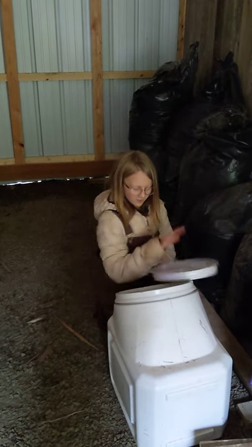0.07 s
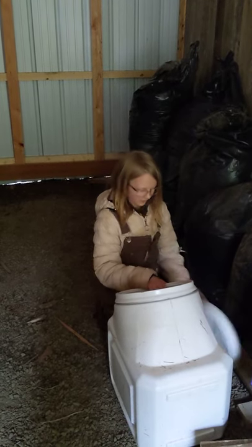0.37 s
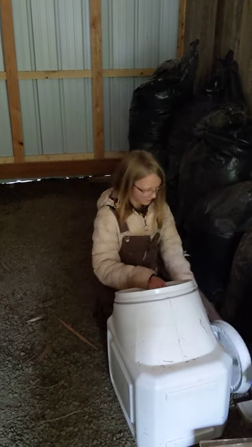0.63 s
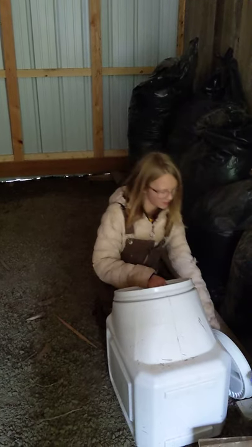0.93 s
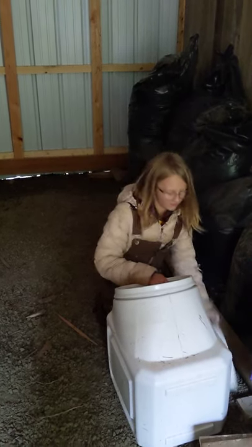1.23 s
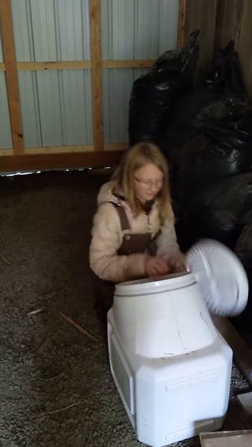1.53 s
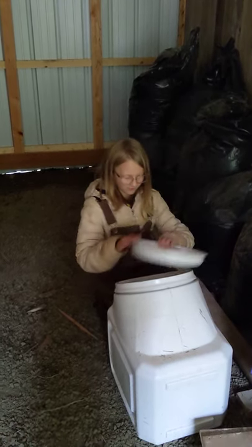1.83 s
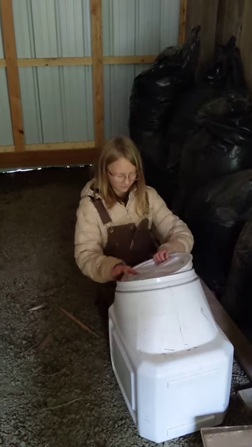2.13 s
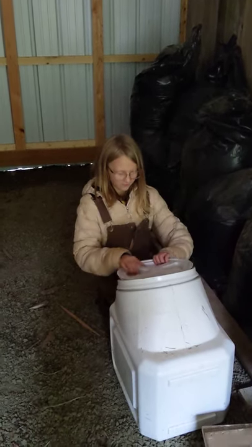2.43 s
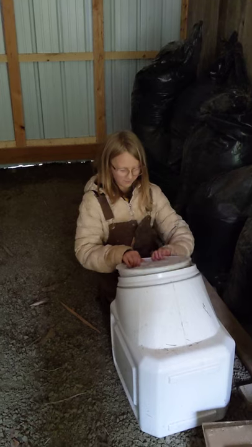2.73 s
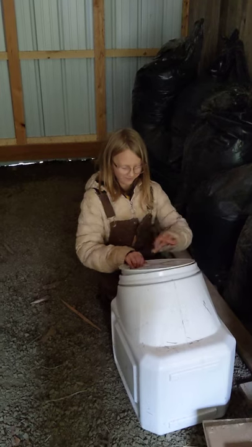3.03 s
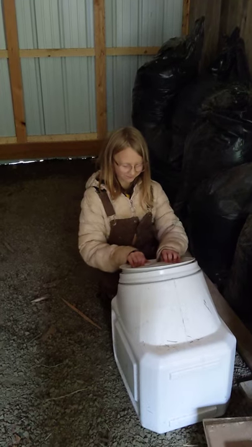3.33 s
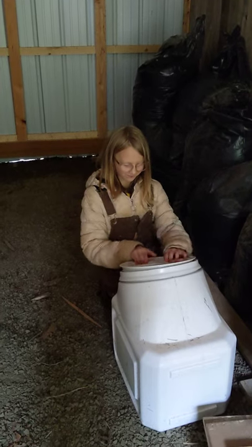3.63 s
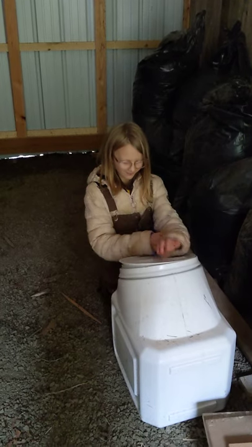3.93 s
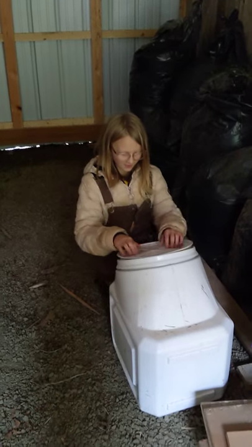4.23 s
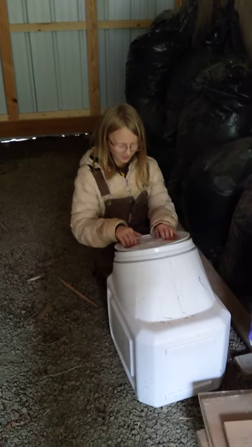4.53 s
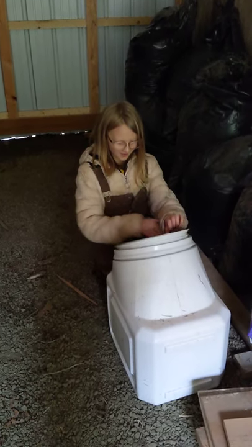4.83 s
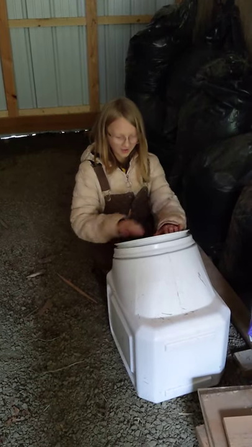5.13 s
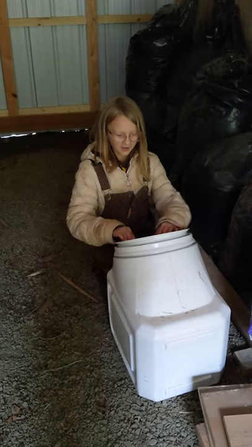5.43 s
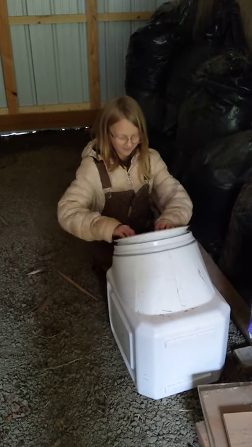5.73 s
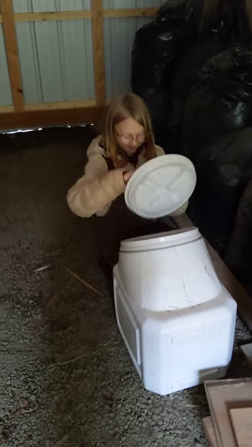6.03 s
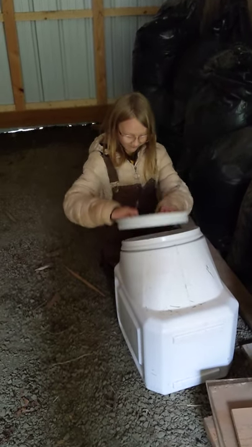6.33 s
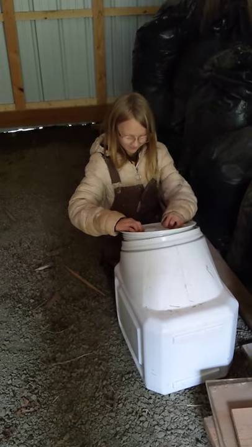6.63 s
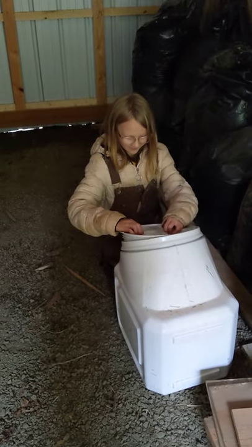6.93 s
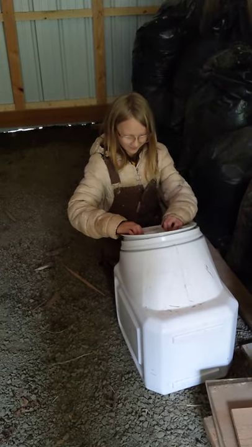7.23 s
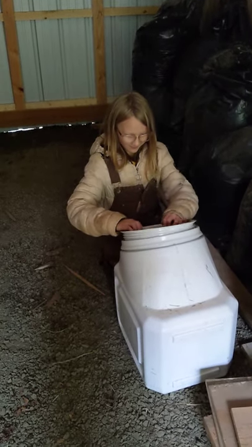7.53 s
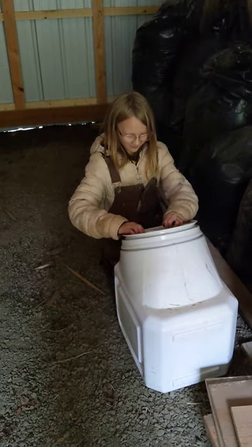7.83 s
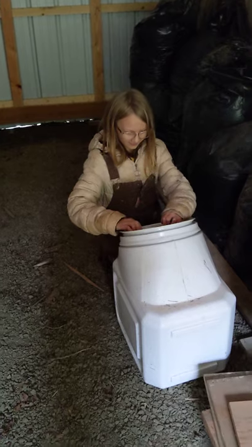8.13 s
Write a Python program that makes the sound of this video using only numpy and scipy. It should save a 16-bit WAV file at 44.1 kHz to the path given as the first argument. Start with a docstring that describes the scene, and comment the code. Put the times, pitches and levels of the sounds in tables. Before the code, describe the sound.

Over faint outdoor air in a quiet barn, a quick, uneven run of hollow plastic knocks ends with a lid landing sharply on the rim of a large bin. Hands then twist and push it, giving rasping scrapes, a low rumble, small bright clicks and dull bumps. It finishes with a cluster of softer thumps and brief plastic creaks, each dying away quickly in the room.

```python
"""Hollow, ringing knocks as a round plastic lid, held free, hits the side of a big storage bin in a barn.
The lid is slapped onto the rim, then turned, clicked and pressed down with dull thuds and short creaks.
Every blow rings the plastic walls and dies away in the barn. Every turn scrapes along the thread,
a stream of tiny slips that makes the bin rumble. A faint wash of outdoor air lies underneath."""
import sys
import numpy as np
from scipy import signal
from scipy.fft import rfft, irfft, next_fast_len
from scipy.io import wavfile

SR = 44100
rng = np.random.default_rng(int(sys.argv[2]) if len(sys.argv) > 2 else 0)


def int16_out(signal):
    """Quantize to a 16-bit WAV file."""
    q = np.round(np.clip(np.atleast_2d(signal).T, -1, 1) * 32767)
    wavfile.write(sys.argv[1], SR, q.astype(np.int16))


N = 369116

# edges of a blow's five registers (boom, hollow, knock, clack, tick): f/Hz
REGISTER_EDGES = [55, 260, 650, 2500, 6500, 15800]
# resonances and notches of the walls: f/Hz, width/Hz, level/dB
WALL_MODES = [(69.3, 5.7, 8), (93, 14, 3.5), (132.7, 11.5, 8), (162.6, 16, 10.5), (354, 46, 8),
              (493, 3.6, 2), (751, 60, 6.5), (842, 31, 6), (907, 59, 8), (1183, 11, 3.5), (1670, 110, 1),
              (1900, 26, -4), (2280, 25, -14)]
# drum tone of the lid held free: f/Hz, width/Hz, level/dB
FREE_LID_MODES = [(444, 10, 19.5)]
# tones of the covered bin: f/Hz, width/Hz, level/dB
COVERED_BIN_MODES = [(187.5, 5.1, 8.8), (300, 10, 11.4)]


def from_db(db):
    """Decibels to gain."""
    return 10 ** (np.asarray(db) / 20)


def rms(x):
    """Root mean square."""
    return np.sqrt(np.mean(x ** 2) + 1e-24)


def at_hz(points, hz):
    """Read a curve on a log-frequency axis."""
    f, value = np.transpose(points)
    return np.interp(np.log(hz + 1), np.log(f), value)


def bins(size):
    """Bin frequencies of a real FFT."""
    return np.arange(size // 2 + 1) * SR / size


def band(low, high, hz):
    """Causal band-pass response."""
    return signal.sosfreqz(signal.butter(3, [low, high], "band", fs=SR, output="sos"), hz, fs=SR)[1]


def drift(rate):
    """Random wander with a spread of 1 and `rate` new values a second."""
    knots = rng.standard_normal(N // 20)
    return np.interp(np.arange(N) * rate / SR, np.arange(len(knots)), knots) * np.sqrt(3 / 2)


def stereo(mid, side, likeness):
    """Left and right from two unrelated signals: likeness 0 is wide, 1 is mono."""
    c = np.clip(likeness, 0, 1)
    return (np.sqrt(1 + c) * mid + np.sqrt(1 - c) * side * np.array([[1], [-1]])) / np.sqrt(2)


def plastic_walls(colour, modes, size, ripple_db, spacing_hz, merge_hz=4000):
    """Stereo response of the walls: a few strong resonances over a ripple of many crowded ones."""
    # direction of the bin: f/Hz, left minus right/dB
    balance = [(100, 1.5), (330, 0), (700, 3.5), (2400, 1.5), (4500, 2.5), (8000, 1.5), (14000, -7)]
    hz = bins(size)
    peaks = sum((from_db(db) ** 2 - 1) / (1 + (2 * (hz - f) / width) ** 2) for f, width, db in modes)
    knots = rng.standard_normal(size // 8)
    # small wall modes crowd in above the lid's drum tone and merge again in the treble
    depth = ripple_db * hz / (hz + FREE_LID_MODES[0][0]) / (1 + (hz / merge_hz) ** 2)
    ripple = depth * np.interp(hz / spacing_hz, np.arange(len(knots)), knots)
    magnitude = from_db(at_hz(colour, hz) + ripple) * np.sqrt(np.maximum(1 + peaks, 0.1))
    # minimum phase, so the ring follows the hit
    cepstrum = irfft(np.log(magnitude))
    cepstrum[1:size // 2] *= 2
    cepstrum[size // 2 + 1:] = 0
    return np.exp(rfft(cepstrum)) * from_db(at_hz(balance, hz) / 2 * np.array([[1], [-1]]))


def contact(colour, s, db, hardness, ring_hz, boom_db=0, *, ring_db, snap_db, pivot_hz=410):
    """Cue for one blow: harder contacts sound brighter; the snap is set by the kind of blow."""
    edges = np.array(REGISTER_EDGES)
    octaves = np.log2(np.sqrt(edges[:-1] * edges[1:]) / pivot_hz)
    levels = db + np.array(colour) + hardness * octaves
    levels[0] += boom_db
    return s, levels, ring_hz, ring_db, snap_db


def knocks():
    """The lid's edge knocks on the bin, last of all on the rim."""
    # knocks: t/s, level/dB, hardness/(dB per octave), ring of the struck spot/Hz, extra boom/dB
    hits = [(.004, -39.5, -3, 686, -3), (.242, -53.5, -0.5, 3300, 3.5), (.3577, -34.5, -0.33, 1500, -0.5),
            (.464, -35.5, 1.5, 990, 0.5), (.581, -30.5, -0.5, 1150, -3), (.871, -28.5, -0.1, 720, -0.5),
            (.912, -33.5, -1, 1270, -3.5), (1.264, -37.5, -1, 750, -1.5), (1.442, -34, -0.86, 1340, -7.5),
            (1.9498, -28.5, 1.13, 4080, 4)]
    # weight of each register, boom to tick: level/dB
    colour = (-2.5, -1, -0.5, -7, -13.5)
    return [contact(colour, *hit, ring_db=10.5, snap_db=-0.2) for hit in hits]


def thuds():
    """Hands press and bump the lid, always near the same spot."""
    # bumps: t/s, level/dB, hardness/(dB per octave)
    hits = [(.027, -33.5, -0.5), (2.034, -34, -1.5), (2.1093, -39.5, 1.05), (2.256, -43.5, 0.1),
            (3.014, -37.5, -1.8), (3.259, -44.5, .5), (3.325, -44, -0.5), (4.68, -52, -3.8),
            (4.7441, -37.5, -0.5), (4.898, -37.5, -2), (4.935, -38.5, 0.5), (5.013, -37, -.5),
            (6.626, -49.5, -1), (6.731, -47, -1.4), (6.916, -48, -1), (7.0375, -47.5, 0.5),
            (7.092, -42.5, -.6), (7.206, -42.5, -0.9), (7.478, -38.5, -2.2), (7.5868, -44.5, -1),
            (7.755, -50, -4.5), (7.905, -50.5, 0), (8.053, -53, -2.3)]
    # weight of each register, boom to tick: level/dB
    colour = (-1.5, -7.5, -11.5, -16, -21.5)
    return [contact(colour, *hit, ring_hz=799, ring_db=13.5, snap_db=-3) for hit in hits]


def creaks():
    """Plastic sticks on plastic and lets go with a short creak."""
    # releases: t/s, level/dB, hardness/(dB per octave), ring of the spot/Hz
    releases = [(.626, -43, 0.5, 2670), (3.259, -48, -1, 3560), (6.962, -56.5, .5, 3440),
                (7.0379, -53, -2, 3220), (7.103, -48.5, -4.5, 3630), (7.1213, -53, 0.8, 3840),
                (7.7544, -46, -4.5, 1700), (7.9055, -47.5, -4.5, 920)]
    # weight of each register, boom to tick: level/dB
    colour = (-9.5, -2, -0.5, -4, -19)
    return [contact(colour, *release, ring_db=15, snap_db=-4.5) for release in releases]


def clicks():
    """Light, bright plastic clicks as the lid is handled and then turned."""
    # clicks: t/s, level/dB, hardness/(dB per octave), ring of the struck spot/Hz
    hits = [(.662, -62, 1.2, 2400), (1.193, -56, 1.36, 980), (2.4129, -43, .5, 1270),
            (4.2564, -60, 2.8, 3540), (4.4965, -52, -.5, 3240), (5.304, -51, -.5, 894),
            (5.7524, -57, -2, 960)]
    # weight of each register, boom to tick: level/dB
    colour = (-1, -5, 2.5, 2, -3.5)
    return [contact(colour, *hit, ring_db=7.5, snap_db=-3) for hit in hits]


def blows(cues, seated_s=1.9, echo_s=0.02, echo_db=4.5, dead_hz=14000, size=32768):
    """Each cue plays as a snap and a short crack in the walls, then the dying tail of bin and barn."""
    # registers, levels against the crack: snap/dB, crack decay/s, tail t60/s, tail/dB, likeness/0-1
    registers = [(23.8, 0.0035, 0.38, -9, 0.97), (20.5, 0.012, 0.39, -8.5, 0.69),
                 (18.2, 0.0056, 0.37, -11.5, 0.03), (14.2, 0.0026, 0.36, -14.5, 0),
                 (15.8, 0.0066, 0.33, -12.5, 0)]
    # broad tone of struck plastic: f/Hz, level/dB
    struck_colour = [(50, -14), (95, 7.5), (220, -5), (400, -8), (580, -11), (1200, -1), (3000, -9),
                     (4900, -10.5), (7000, -27), (9200, -24.5), (11500, -26), (15500, -37.5)]
    t, hz, out = np.arange(size) / SR, bins(size), np.zeros((2, N + size))
    attack = int(.03 * SR)
    bands = [band(low, high, hz) for low, high in zip(REGISTER_EDGES, REGISTER_EDGES[1:])]
    # the tail swells when the first reflections come back
    echo = from_db(echo_db * np.exp(-(2 * (t - echo_s) / echo_s) ** 2))
    shapes = [(from_db(snap_db), np.exp(-t / crack_s), echo * from_db(tail_db - 60 * t / t60), likeness)
              for snap_db, crack_s, t60, tail_db, likeness in registers]
    for s, levels, ring_hz, ring_db, extra_snap_db in cues:
        # each spot has its own ring and ripple; plastic damps its high rings most
        spot_ring = (ring_hz, ring_hz ** 2 / dead_hz, ring_db)
        modes = WALL_MODES + [spot_ring] + (FREE_LID_MODES if s < seated_s else COVERED_BIN_MODES)
        body = plastic_walls(struck_colour, modes, size, ripple_db=5.5, spacing_hz=97.1)
        start = round(s * SR)
        noise = rng.standard_normal((4, size))
        # the curved edge grazes first and lands fully about 1.5 ms later
        landing = 1 + int(.0015 * SR * (.5 + rng.random()))
        for passband, db, (snap, crack_fade, tail_fade, likeness) in zip(bands, levels, shapes):
            force = stereo(*noise[:2], likeness) * crack_fade + stereo(*noise[2:], likeness) * tail_fade
            force[:, [0, landing]] += snap * from_db(extra_snap_db)
            force[:, :landing] *= from_db(-6)
            sound = irfft(rfft(force) * body * passband)
            out[:, start:start + size] += from_db(db) * sound / rms(sound[:, :attack])
    return out[:, :N]


def stroke_gains(t, drop_db=21, roundness=1.3, rasp_db=-4, rasp_follows=0.34):
    """Gains of rumble, rasp, hiss and sizzle: strokes swell and fade; pressure brings out their lows."""
    # slides of the lid: peak t/s, swell/s, fade/s, hiss/dB, rumble over hiss/dB, sizzle over hiss/dB
    strokes = [(.01, 0.15, 0.18, -47, -14, 1), (.33, 0.43, 0.29, -54, 3, -6.5),
               (.634, 0.013, 0.053, -35, -23, -15), (1.02, 0.24, 0.75, -59.5, 1, -3),
               (1.28, .05, 0.083, -35.5, -14, -16), (1.343, 0.027, 0.059, -39.5, -16, -16),
               (2.3, 0.1, 0.22, -50, 4.5, -16), (2.51, 0.24, 0.22, -58.5, 11.5, -7),
               (2.92, .07, 0.059, -58.5, -16, -1), (3.1, 0.23, 0.23, -61, 12.5, -18),
               (3.71, 0.17, 0.091, -58.5, 5.5, -5.5), (3.865, 0.15, 0.31, -47.5, 1, -2.5),
               (4.015, 0.12, 0.18, -46, 4.5, -2.5), (4.16, 0.28, 0.39, -66.5, 17.5, -12),
               (4.59, 0.11, 0.14, -55.5, 1.5, -4.5), (4.76, 0.083, 0.066, -44, 1, -9.5),
               (4.9, 0.17, 0.24, -45, 4, -2), (4.995, 0.088, 0.07, -43.5, 4, -19),
               (5.359, 0.054, 0.11, -57.5, -22, 2), (5.863, 0.067, 0.091, -41, -4.5, -6.5),
               (6.44, 0.065, 0.084, -56.5, -28, -14), (7.1, 0.25, .32, -73.5, 25, 6),
               (7.36, .06, 0.061, -64.5, 8.5, 0), (8.34, 0.13, 0.13, -66.5, 1, 0)]
    # hands and sleeves never quite rest: rumble/dB, rasp/dB, hiss/dB, sizzle/dB
    sleeves = (-67, -62, -78, -72.5)
    coarse = t[::N // 4000]
    power = from_db(sleeves)[:, None] ** 2
    for s, swell_s, fade_s, db, pressure_db, sizzle_db in strokes:
        from_peak = np.maximum((s - coarse) / swell_s, (coarse - s) / fade_s)
        colour = np.array([pressure_db, rasp_db + rasp_follows * pressure_db, 0, sizzle_db])
        power = power + from_db(db + colour[:, None] - drop_db * from_peak ** roundness) ** 2
    return [np.interp(t, coarse, np.sqrt(p)) for p in power]


def rubbing(slips_per_s=300, spread_db=4.5, judder_db=1.5, judder_hz=70, barn_db=10, barn_t60=0.36):
    """Dense, uneven slips at three places round the rim drive the walls; the barn smears them."""
    # edges of rumble, rasp and hiss: f/Hz
    edges = [55, 260, 1500, 15800]
    # broad tone of rubbed plastic: f/Hz, level/dB
    rubbed_colour = [(50, -2.5), (150, -18), (260, -25), (520, -16.5), (850, -23), (1500, -23),
                     (4400, -19.5), (7300, -28), (10500, -25.5), (15500, -36.5)]
    # stereo image of the barn's reverb: f/Hz, likeness/0-1
    barn_likeness = [(150, 0.99), (500, 0.22), (5000, 0.018)]
    size = 2 * next_fast_len(N // 2 + 1)
    hz, t = bins(size), np.arange(N) / SR
    rumble, rasp, hiss, sizzle = stroke_gains(t)
    scrape = 0
    for place in range(3):
        slips = (rng.random(size) < slips_per_s / SR) * rng.choice([-1, 1], size)
        slips = slips * from_db(spread_db * np.minimum(rng.exponential(1, size), 4))
        tail = rng.standard_normal((2, SR)) * from_db(-60 * t[:SR] / barn_t60)
        barn = stereo(*rfft(tail / np.linalg.norm(tail[0]), size), at_hz(barn_likeness, hz))
        # the deep rumble comes straight from the bin, the higher sound also by way of the barn
        scrape = scrape + rfft(slips) * (1 + from_db(barn_db) * barn * hz / (hz + edges[1]))
    modes = WALL_MODES + COVERED_BIN_MODES
    scrape = scrape * plastic_walls(rubbed_colour, modes, size, ripple_db=1.5, spacing_hz=70.5)
    out, shared_judder = 0, drift(judder_hz)
    for low, high, gain in zip(edges, edges[1:], (rumble, rasp, hiss)):
        sound = irfft(scrape * band(low, high, hz))[:, :N]
        judder = judder_db * (shared_judder + drift(judder_hz)) / np.sqrt(2)
        out = out + sound / rms(sound) * gain * from_db(judder)
    # the top of the hiss rides on the sizzle gain
    treble = irfft(rfft(out, size) * abs(band(3900, SR * .45, hz)) ** 2)[:, :N]
    return out + treble * (sizzle / hiss - 1)


def outdoor_air(level_db=-59.5, wander_rad=0.52):
    """A soft, steady wash of air, wide in the treble, with two faint wavering tones."""
    # tone of the air: f/Hz, relative level/dB
    air_colour = [(22, 0.9), (52, -2), (97, -14), (240, -12), (335, -17), (420, -13), (600, -18),
                  (830, -14), (1650, -28), (5000, -35), (7700, -39), (12000, -33), (15800, -38)]
    # stereo image of the air: f/Hz, likeness/0-1
    air_likeness = [(100, .95), (350, 0.95), (1200, 0.42), (9000, 0.017)]
    # faint tones: f/Hz, level/dB
    faint_tones = [(420, -80), (5023, -88)]
    size = 2 * next_fast_len(N // 2 + 1)
    hz, t = bins(size), np.arange(N) / SR
    noise = stereo(*rfft(rng.standard_normal((2, size))), at_hz(air_likeness, hz))
    air = irfft(noise * from_db(at_hz(air_colour, hz)) * hz / (hz + 10))[:, :N]
    tones = sum(from_db(db) * np.sqrt(2) * np.sin(2 * np.pi * f * t + wander_rad * drift(23))
                for f, db in faint_tones)
    return from_db(level_db) * air / rms(air) + tones


def scene():
    """Lid and bin in the quiet barn."""
    return blows(knocks() + clicks() + creaks() + thuds()) + rubbing() + outdoor_air()


def record(dry):
    """A steep low-pass takes off the top above 16 kHz."""
    return signal.sosfilt(signal.ellip(10, .1, 80, 16000, fs=SR, output="sos"), dry)


dry = scene()
out = record(dry)
int16_out(out)
```